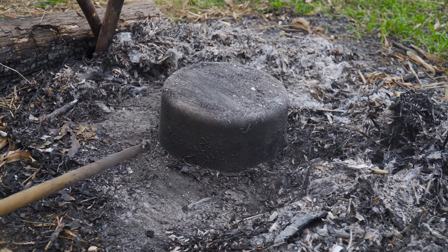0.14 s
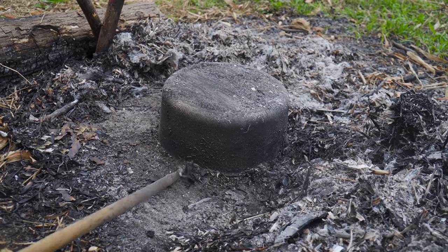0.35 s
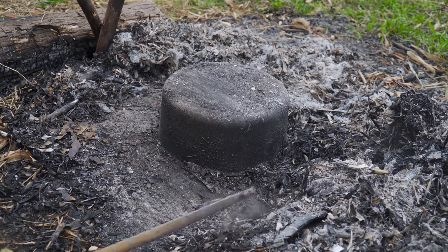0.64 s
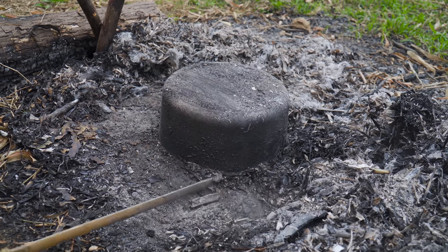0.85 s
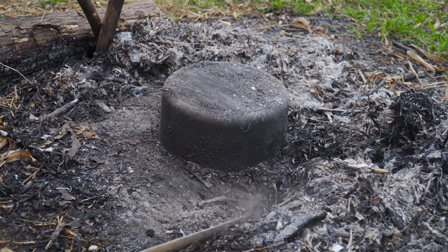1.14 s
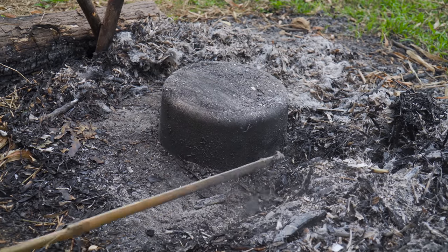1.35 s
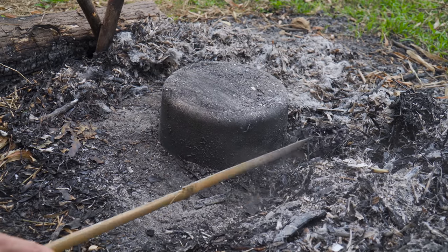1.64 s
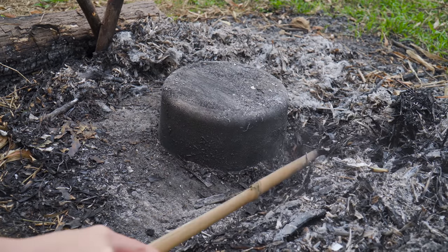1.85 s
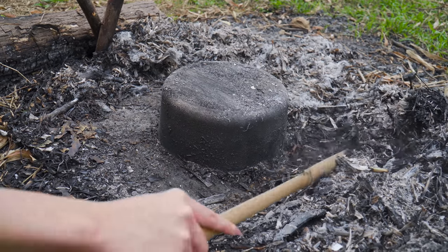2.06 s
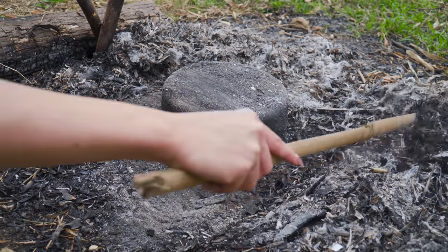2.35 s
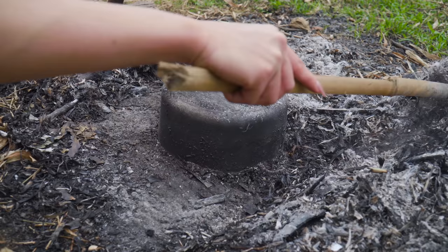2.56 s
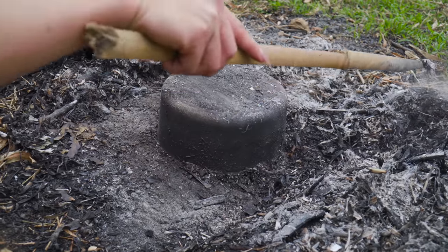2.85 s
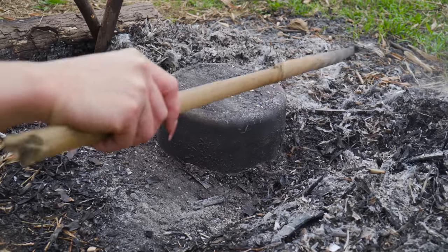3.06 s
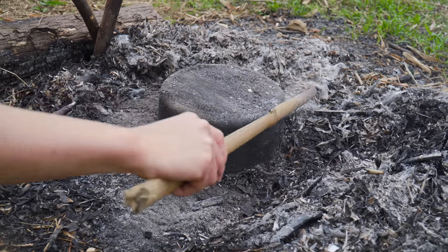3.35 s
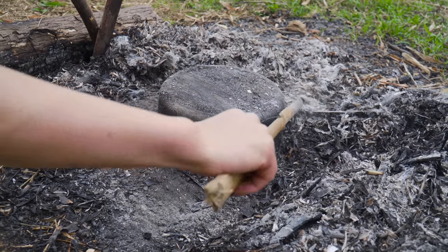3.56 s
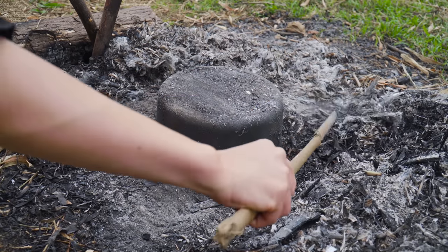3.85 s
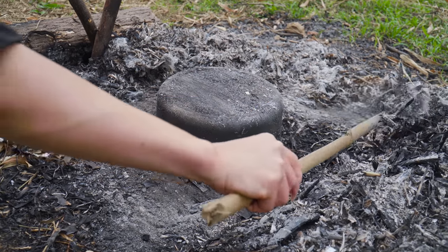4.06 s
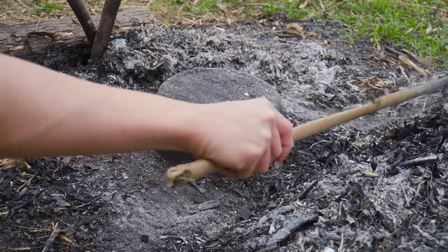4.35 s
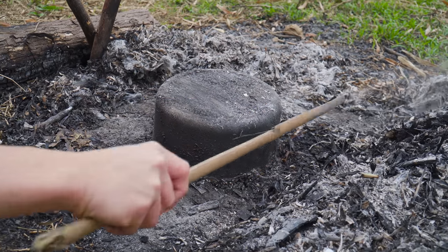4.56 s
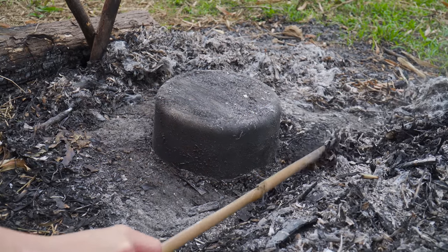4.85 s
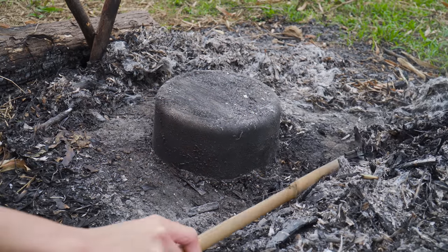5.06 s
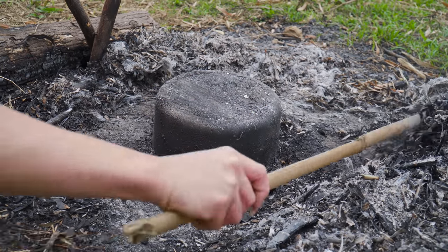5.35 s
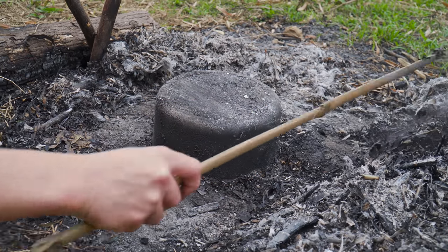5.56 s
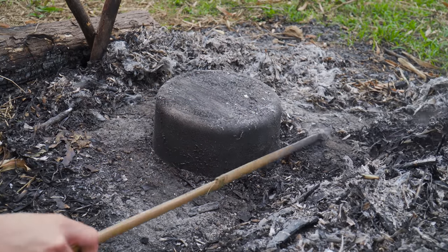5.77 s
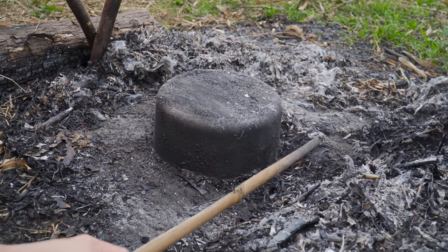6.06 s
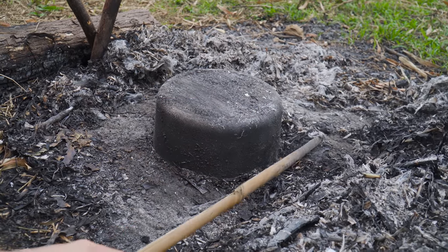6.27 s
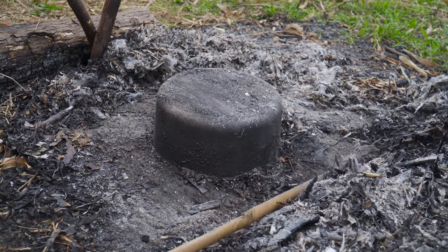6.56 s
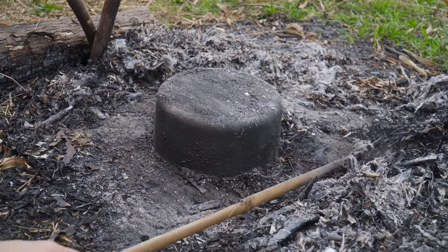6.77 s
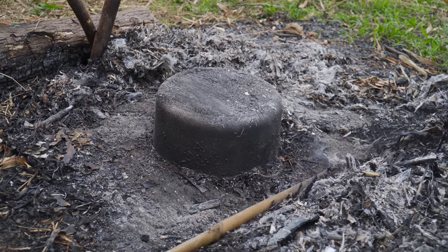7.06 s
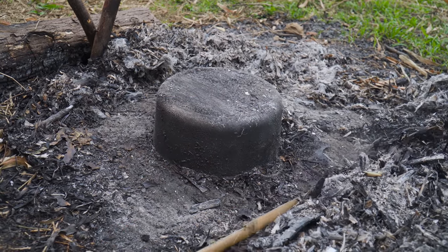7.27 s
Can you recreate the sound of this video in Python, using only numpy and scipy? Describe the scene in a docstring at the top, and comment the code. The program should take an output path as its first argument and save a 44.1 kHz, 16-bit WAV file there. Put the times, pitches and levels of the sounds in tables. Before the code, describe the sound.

Crunching, scraping strokes of a stick in cinders, with softly hissing ash and a few dull, briefly ringing knocks on a metal pot.

```python
"""A bamboo stick rakes cold ash and charcoal away from an upturned metal pot, outdoors.
The tip crunches through the cinders, snaps bits of charcoal and flicks up fine ash that hisses
as it falls. Now and then it knocks the pot, whose ring is cut short by the ash it stands in.
One microphone with a steep wind filter takes it all; a low rumble and a faint tone lie far behind."""
import sys
import numpy as np
from scipy import signal
from scipy.fft import rfft, irfft, next_fast_len
from scipy.io import wavfile

SR = 44100
rng = np.random.default_rng(int(sys.argv[2]) if len(sys.argv) > 2 else 0)


def int16_out(signal):
    """Quantize to a 16-bit WAV file."""
    q = np.round(np.clip(np.atleast_2d(signal).T, -1, 1) * 32767)
    wavfile.write(sys.argv[1], SR, q.astype(np.int16))


N = 326781
TIME = np.arange(N) / SR

# spectrum of crunching cinders: frequency_hz, relative_db
CINDER_COLOUR = [(100, -15), (300, 0.5), (500, 1.5), (700, -2), (950, 1.5), (1400, 0.5), (2400, -1),
                 (3700, -2), (4300, -6.5), (5300, -5), (6400, -17.5), (16000, -21)]
# spectrum of hissing fine ash: frequency_hz, relative_db
ASH_COLOUR = [(500, -9), (3000, 1), (5500, 1.5), (6800, -2), (8300, -1), (9700, 1), (12500, 2),
              (16000, -3.5)]


def amp(db):
    """Decibels to gain."""
    return 10 ** (np.asarray(db) / 20)


def unit(x):
    """Scales to rms 1."""
    return x / np.sqrt(np.mean(x ** 2) + 1e-20)


def add(mix, start_s, sound):
    """Mixes a sound in at a time."""
    part = mix[max(0, round(start_s * SR)):][:len(sound)]
    part += sound[:len(part)]


def response(colour, size=4096):
    """Minimum-phase impulse response of energy 1 with the given spectral shape."""
    hz, db = np.transpose(colour)
    bin_hz = abs(np.fft.fftfreq(size, 1 / SR))
    log_gain = np.log(amp(np.interp(np.log(bin_hz + 1), np.log(hz), db)))
    spectrum = np.exp(np.conj(signal.hilbert(log_gain)))
    taps = np.fft.ifft(spectrum).real[:size // 2]
    return taps / np.linalg.norm(taps)


def tint(x, colour):
    """Gives a white signal a colour and keeps its power."""
    return signal.oaconvolve(x, response(colour))[:len(x)]


def wander(rate_hz, size=16384):
    """Smooth random drift of rms 1, rolled off above the rate."""
    hz = np.fft.rfftfreq(size, TIME[-1] / size)
    slow = irfft(rfft(rng.standard_normal(size)) / (1 + (hz / rate_hz) ** 4))
    return np.interp(TIME, np.linspace(0, TIME[-1], size), unit(slow))


def swell(peak_s, spread_s):
    """A gain that rises smoothly to 1 at a moment and fades again."""
    return 1 / np.cosh(np.clip(1.5 * (TIME - peak_s) / spread_s, -20, 20))


def grains(per_s, spread_db):
    """Tiny impacts at random times and of random size, at rms 1."""
    size = amp(spread_db * np.minimum(rng.exponential(1, N), 4))
    return unit(size * rng.choice([-1, 1], N) * (rng.random(N) < per_s / SR))


def noise_burst(t, level_db, t60_s, colour):
    """Coloured noise that starts at once and dies away."""
    return tint(rng.standard_normal(len(t)) * amp(level_db - 60 * t / t60_s), colour)


def distant_air(level_db=-49.5, rumble_db=2.0, flutter_db=0.84, rumble_top_hz=750):
    """Steady open air far from the microphone, with a wavering rumble under it."""
    # spectrum of the outdoor background: frequency_hz, relative_db
    air_colour = [(60, 0), (125, 1.5), (170, 1), (230, -5.5), (330, -8), (480, -17), (650, -16.5),
                  (830, -14.5), (1050, -19), (2000, -25), (4000, -31.5), (7000, -40), (12000, -47),
                  (16000, -48)]
    # slow rise and fall of the rumble: time_s, relative_db
    rumble_curve = [(0.0, -51), (0.16, -51.5), (2.41, -51.5), (3.07, -56.5), (3.46, -49.5), (3.76, -49),
                    (4.37, -53), (4.87, -53.5), (5.59, -54.5), (6.07, -47.5), (6.48, -53.5), (7.41, -51.5)]
    air = tint(rng.standard_normal(N), air_colour)
    rumble = signal.sosfiltfilt(signal.butter(2, rumble_top_hz, fs=SR, output="sos"), air)
    drift_db = np.interp(TIME, *np.transpose(rumble_curve))
    rumble_gain = amp(rumble_db + drift_db - drift_db.mean() + flutter_db * wander(rate_hz=13))
    return amp(level_db) * (air - rumble + rumble * rumble_gain)


def far_tone(pitch_hz=825, width_hz=70, rest_db=-72):
    """A faint, fuzzy tone swells and fades in the distance."""
    # swells of the tone: peak_s, spread_s, level_db
    swells = [(.9, 0.35, -67), (3.85, 0.29, -61), (6.21, .11, -54.5)]
    phase = 2 * np.pi * pitch_hz * TIME
    tone = unit(wander(width_hz) * np.cos(phase) + wander(width_hz) * np.sin(phase))
    gain = amp(rest_db) + sum(amp(db) * swell(peak_s, spread_s) for peak_s, spread_s, db in swells)
    return tone * gain


def jabs(cinder_db=1.5, ash_db=4.0):
    """Each jab crushes a small heap of grains at once: a quick rise and a slower fall."""
    # the tip cracks cinders, or a knock shakes grit loose: peak_s, relative_db, length_s, ash_offset_db
    crushes = [(0.337, -55.5, 0.0094, -0.5), (0.398, -52.5, 0.0066, 2), (0.416, -46, 0.0028, -3),
               (0.435, -40.5, 0.0042, -8), (0.447, -46, 0.0047, -4), (0.55, -48.5, 0.009, -5),
               (0.571, -60, .004, 4), (0.639, -47, 0.0019, 9), (0.927, -44, 0.0084, -6.5),
               (1.177, -46.5, 0.0082, 0.5), (1.191, -45, 0.0063, -6), (1.28, -56, .003, -12),
               (1.452, -59, 0.019, -24), (1.492, -52.5, 0.0012, -6), (1.663, -44.5, 0.013, -1.5),
               (1.709, -38.5, 0.0073, -11.5), (1.877, -44, .024, -10), (1.956, -47.5, 0.016, -6.5),
               (3.39, -56, .012, -18), (3.926, -50.5, 0.023, -7), (4.102, -47, 0.0015, 11.5),
               (4.7592, -42, 0.0067, -4.5), (4.879, -43, 0.0082, -1), (4.949, -49.5, 0.015, 6),
               (5.05, -53, .0008, -4), (5.834, -44.5, 0.0056, 0.5), (5.89, -46, .003, 2),
               (5.908, -62, .024, 1), (5.942, -56, .002, 6), (5.951, -57, .002, 3),
               (5.991, -42.5, .0046, -10), (6.119, -49.5, 0.0074, -1), (6.368, -47, .004, -10),
               (6.426, -42.5, 0.0011, 4), (6.4299, -40, 0.00074, 1), (6.438, -39, .0007, 2.5),
               (6.441, -42.5, 0.0028, -10), (6.537, -43.5, 0.0069, -3.5), (6.61, -42.5, 0.009, -7),
               (7.039, -56, 0.0076, -4), (7.059, -34.5, 0.0046, -7.5), (7.079, -52, 0.0047, -8),
               (7.123, -45.5, .016, -2.5), (7.3259, -41, 0.0022, 8)]
    coarse, fine = np.zeros((2, N))
    for peak_s, db, length_s, ash_offset_db in crushes:
        age = 2 * TIME[:4096] / length_s
        push = amp(db) * age * np.exp(1 - age)
        add(coarse, peak_s - length_s / 2, push * amp(cinder_db))
        add(fine, peak_s - length_s / 2, push * amp(ash_db + ash_offset_db))
    cinders = tint(coarse * grains(per_s=14000, spread_db=3.5), CINDER_COLOUR)
    ash = tint(fine * grains(per_s=16000, spread_db=2.5), ASH_COLOUR)
    return cinders + bamboo_ring(cinders) + ash


def bamboo_ring(crunch):
    """The hollow stick resonates with the crunch at its tip."""
    # resonances of the bamboo: pitch_hz, width_hz, gain_db
    resonances = [(2290, 130, -4.5), (2850, 350, -9.5), (3520, 170, -3), (4570, 360, -2.5),
                  (5300, 570, -13)]
    return sum(amp(db) * signal.lfilter(*signal.iirpeak(hz, hz / width_hz, SR), crunch)
               for hz, width_hz, db in resonances)


def stirring(bite_s=0.008, settle_s=0.03, arch_db=3.7, ash_build_db=5.5, trickle_db=(-74.5, -78.5)):
    """Levels in dB of moving cinders and fine ash: strokes and showers add power to a steady trickle."""
    # the tip drags through the heap: start_s, length_s, cinders_db, ash_db, rise_db
    strokes = [(0.381, 0.185, -53, -59.5, -8.8), (0.591, 0.067, -61, -62.5, 3),
               (0.913, 0.17, -57, -59.5, 3), (1.103, 0.09, -57, -62.5, 13),
               (1.425, 0.037, -62, -81.0, -0.1), (1.689, 0.33, -46, -53.5, 1.5),
               (3.348, 0.05, -58.3, -71, -1.8), (3.846, 0.16, -52, -67, 0.5),
               (4.748, 0.25, -46.5, -49.7, 5.5), (5.949, 0.18, -49, -58, 4.5),
               (6.338, 0.13, -54.5, -63, 14.9), (6.491, 0.083, -46.5, -55.5, 16.5),
               (7.097, 0.131, -52.5, -58.5, 0), (7.234, 0.19, -49.5, -55.5, -4.2)]
    # ash thrown up by a stroke falls back: peak_s, spread_s, cinders_db, ash_db
    showers = [(0.7, 0.07, -74.6, -69.0), (1.29, 0.07, -78, -69), (2.23, 0.26, -54, -54.1),
               (2.67, 0.18, -60.5, -64.5), (3.72, 0.076, -66.5, -79), (4.19, 0.26, -55, -57.5),
               (4.57, 0.22, -66.5, -71.5), (5.31, 0.22, -58.5, -55.5), (6.28, 0.26, -63, -83.3),
               (6.77, 0.13, -60.5, -64.5)]
    coarse, fine = (np.full(N, amp(db) ** 2) for db in trickle_db)
    t = TIME[:SR]
    for start_s, length_s, cinders_db, ash_db, rise_db in strokes:
        travel = np.minimum(t / length_s, 1) - 0.5
        # the tip bites in, presses hardest midway and lifts; the cinders settle
        contact = (1 - np.exp(-t / bite_s)) * np.exp(-np.maximum(t - length_s, 0) / settle_s)
        push = contact * amp(rise_db * travel - arch_db * (2 * travel) ** 2)
        add(coarse, start_s, (push * amp(cinders_db)) ** 2)
        # fine ash piles up ahead of the tip
        add(fine, start_s, (push * amp(ash_db + ash_build_db * travel)) ** 2)
    for peak_s, spread_s, cinders_db, ash_db in showers:
        falling = swell(peak_s, spread_s)
        coarse += (falling * amp(cinders_db)) ** 2
        fine += (falling * amp(ash_db)) ** 2
    return 10 * np.log10(coarse), 10 * np.log10(fine)


def raking(cinder_db=-1, ash_db=2, slip_hz=160, shove_hz=30, bite_db=7, pressed_db=-53, tick_db=-7):
    """Cinders crumble in clumps while the tip digs; when fine ash prevails it pours smoothly."""
    coarse_db, fine_db = stirring()
    digging = np.clip((coarse_db - fine_db) / bite_db, 0.3, 1.1)
    clumps_db = digging * (2.5 * wander(slip_hz) + 0.4 * wander(shove_hz))
    cracks = grains(per_s=6000, spread_db=3.5)
    cinders = tint(cracks * amp(coarse_db + cinder_db + clumps_db), CINDER_COLOUR)
    flakes = grains(per_s=16000, spread_db=4.0)
    large_flakes = amp(tick_db) * digging * grains(per_s=94, spread_db=-3)
    ash = tint((flakes + large_flakes) * amp(fine_db + ash_db + 0.75 * clumps_db), ASH_COLOUR)
    # the bamboo rings only while it is pressed into the heap
    pressure = np.minimum(amp(coarse_db - pressed_db), 1)
    return cinders + bamboo_ring(cinders * pressure) + ash


def charcoal_snaps(crumble_db=-19, crumble_t60_s=0.032, crumble_top_hz=3800):
    """A snap is a few quick cycles that swell and die, followed by crumbs muffled in the ash."""
    # bits of charcoal break: start_s, peak_db, pitch_hz, length_s
    breaks = [(0.441, -31, 3800, 0.0034), (0.5505, -33, 790, .011), (0.6397, -37, 5130, 0.0071),
              (0.6458, -9, 1950, 0.0031), (.6462, -30, 2970, 0.0053), (0.6474, -26, 470, 0.014),
              (.651, -30, 1900, .007), (3.974, -38, 794, .012), (4.102, -33, 4740, .008),
              (4.301, -43, 920, .019), (4.7605, -29.5, 3610, .012), (4.818, -29, 2900, 0.0032),
              (4.839, -31, 3000, 0.0041), (4.883, -28, 2800, 0.0066), (4.902, -34, 2240, 0.006),
              (5.048, -36, 2300, 0.0054), (6.4413, -30, 2830, 0.0041), (7.062, -33, 3030, 0.005)]
    out, t = np.zeros(N), TIME[:4096]
    muffle = signal.butter(4, crumble_top_hz, fs=SR, output="sos")
    for start_s, peak_db, pitch_hz, length_s in breaks:
        age = np.log(1000) * 2 * t / length_s
        crack = np.sin(2 * np.pi * pitch_hz * t) * age * np.exp(1 - age)
        crumbs = noise_burst(t, crumble_db, crumble_t60_s, CINDER_COLOUR)
        add(out, start_s, amp(peak_db) * (crack + signal.sosfilt(muffle, crumbs)))
    return out


def pot_ring(t, ring_db, tilt_db_per_octave, spot, contact_s=0.00028):
    """The metal wall rings, damped by ash; the spot struck decides how much each mode family sounds."""
    # eight families of pot modes, each mode: pitch_hz, relative_db, t60_s
    families = [
        [(699, -0.5, 0.11)],
        [(1181, -0.5, 0.2)],
        [(1242, 0.5, 0.15)],
        [(1805, -1.5, 0.22)],
        [(993, -5.5, 0.041), (1470, -2.5, 0.024), (2000, -12, 0.056), (2143, 0.5, 0.033)],
        [(2200, 7, 0.039), (2706, -3, 0.14), (3030, -2, 0.14), (3170, -4.5, 0.11)],
        [(3290, 3.5, 0.038), (3666, 6, 0.057), (3690, -5.5, 0.12), (3950, -3, 0.061), (3980, -11, 0.12)],
        [(4280, -0.5, 0.053), (4560, -37, 0.04), (4360, 2, 0.018), (4810, 0, 0.037), (5500, 5, 0.017)],
    ]
    # for each spot on the pot, one value a family: gain_db
    spots = {"rim": [-25, -5.5, -8, -16.5, -2.5, -8.5, -3, -7], "near wall": [0, -7, -0.5, -19.5, -11, -33,
             -34, -26], "shoulder": [1, -15, -16.5, -8, -15, -22.5, -27, -16], "foot": [0.5, -15, -33, -14,
             -26, -33, -16, -9], "far wall": [0, -17, -17, -7, -21, -12.5, -20, -32], "side wall": [0, -6,
             -11, -9.5, -4, -31, -21.5, -33]}
    lowest_hz = families[0][0][0]
    ring = np.zeros(len(t))
    for family, family_db in zip(families, spots[spot]):
        for hz, mode_db, t60_s in family:
            level_db = ring_db + family_db + mode_db + tilt_db_per_octave * np.log2(hz / lowest_hz)
            ring += amp(level_db - 60 * t / t60_s) * np.sin(2 * np.pi * (hz * t + rng.random()))
    return ring * (1 - np.exp(-t / contact_s))


def pot_knocks(clack_gain_db=-4.0, clack_t60_s=0.028, scatter_db=-23, scatter_t60_s=0.06):
    """The pot thuds on its bed of ash, the stick clacks, and the wall rings briefly."""
    # knocks and rebounds: start_s, thud_db, clack_db, ring_db, tilt_db_per_octave, spot
    hits = [(1.662, -19.5, -28, -43, 3, "rim"), (1.669, -26.5, -35, -50, 2, "rim"),
            (1.713, -16, -40, -21, 1.5, "near wall"), (1.7322, -23, -48, -45, -3, "near wall"),
            (1.7872, -28.5, -47, -44, 4, "near wall"), (3.2564, -9.5, -18.5, -15.5, 0, "shoulder"),
            (3.3441, -19.5, -41, -40, 2.5, "foot"), (3.374, -34, -58, -42.5, 0.5, "foot"),
            (3.403, -34, -40, -38, -5.5, "rim"), (3.463, -26.5, -46, -34, -4, "foot"),
            (3.628, -32.5, -38.5, -38.5, -0.5, "far wall"), (5.831, -11, -16, -24, 0, "rim"),
            (5.8916, -9.5, -20, -13.5, 0, "side wall"), (5.909, -23, -39, -45, 0, "side wall"),
            (5.978, -26, -54, -53, 0, "side wall")]
    # spectrum of the pot's thud: frequency_hz, relative_db
    thud_colour = [(60, -34), (125, -9), (215, 5), (330, -0.5), (530, -4), (800, -18), (1500, -42),
                   (3000, -41), (16000, -67)]
    # spectrum of the stick's clack: frequency_hz, relative_db
    clack_colour = [(150, -29), (400, -7), (900, 6.5), (2000, -2.5), (3700, 3.5), (5300, -7), (6500, -16.5),
                    (8500, -14.5), (11000, -24.5), (16000, -24)]
    out, t = np.zeros(N), TIME[:SR // 3]
    thud = response(thud_colour)
    thud /= abs(thud).max()
    for start_s, thud_db, clack_db, ring_db, tilt_db_per_octave, spot in hits:
        ring = pot_ring(t, ring_db, tilt_db_per_octave, spot)
        clack = noise_burst(t, clack_db + clack_gain_db, clack_t60_s, clack_colour)
        # the ground and the logs nearby scatter the thud
        scatter = noise_burst(t, thud_db + scatter_db, scatter_t60_s, thud_colour)
        add(out, start_s, ring + clack + scatter)
        add(out, start_s, amp(thud_db) * thud)
    return out


def scene():
    """Stick, heap and pot in front of the distant background, at one microphone in the open."""
    return (raking() + jabs() + charcoal_snaps() + pot_knocks() + distant_air() + far_tone())[None]


def record(dry, low_cut_hz=115, leak_db=-44, top_hz=16000):
    """The microphone's steep wind filter takes out the bass; a low-pass trims the highest treble."""
    size = next_fast_len(N + SR // 4, True)
    hz = np.fft.rfftfreq(size, 1 / SR)
    wind_filter = amp(leak_db) + 1 / (1 + (low_cut_hz / np.maximum(hz, 1)) ** 50)
    cut = irfft(rfft(dry, size) * wind_filter, size)[:, :N]
    low_pass = signal.firwin(511, top_hz, window=("kaiser", 9), fs=SR)
    return signal.oaconvolve(cut, low_pass[None], "same")


dry = scene()
out = record(dry)
int16_out(out)
```